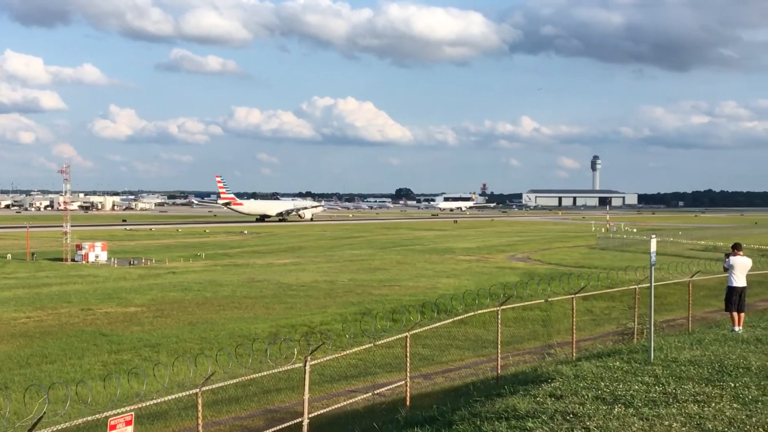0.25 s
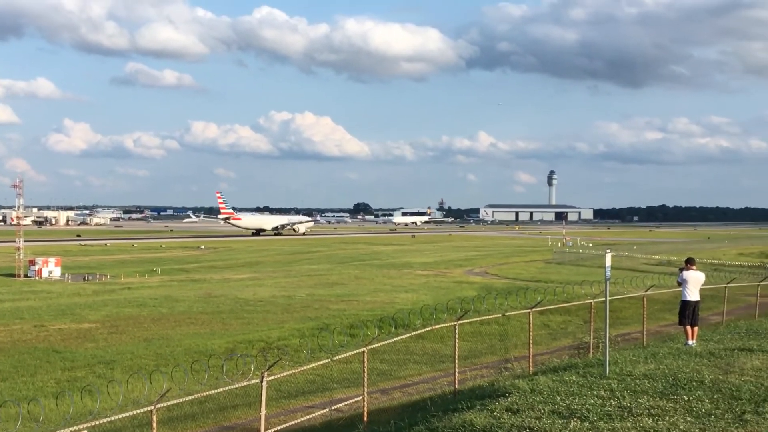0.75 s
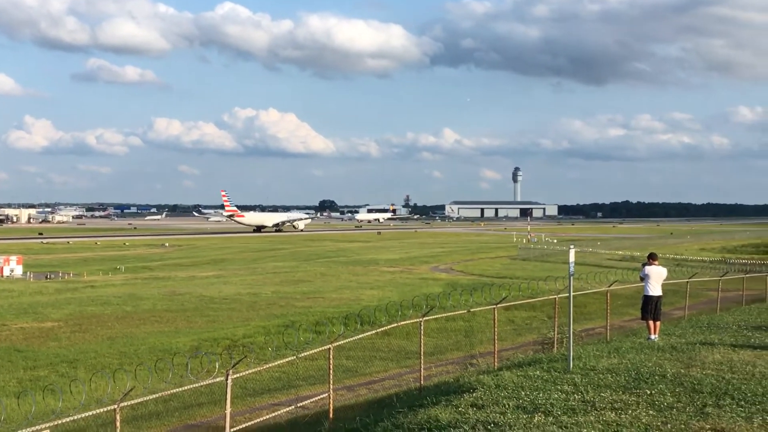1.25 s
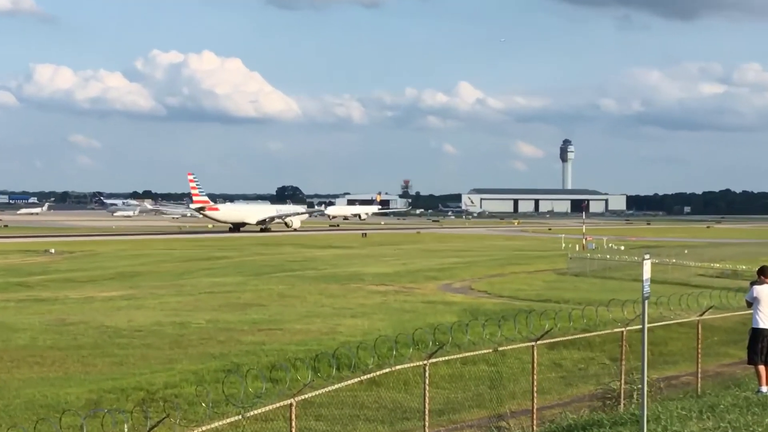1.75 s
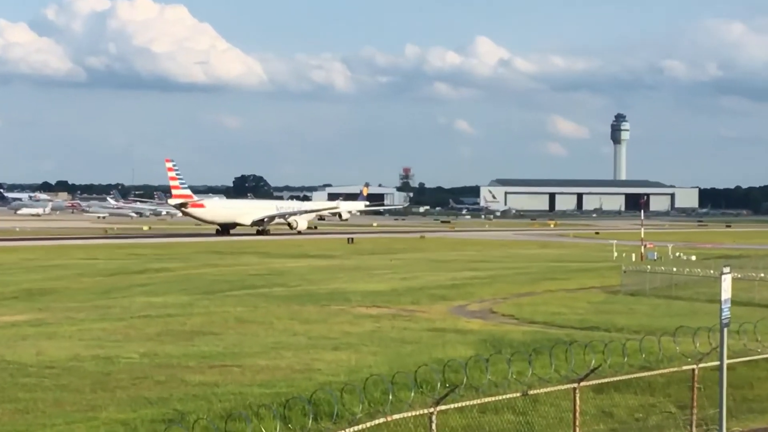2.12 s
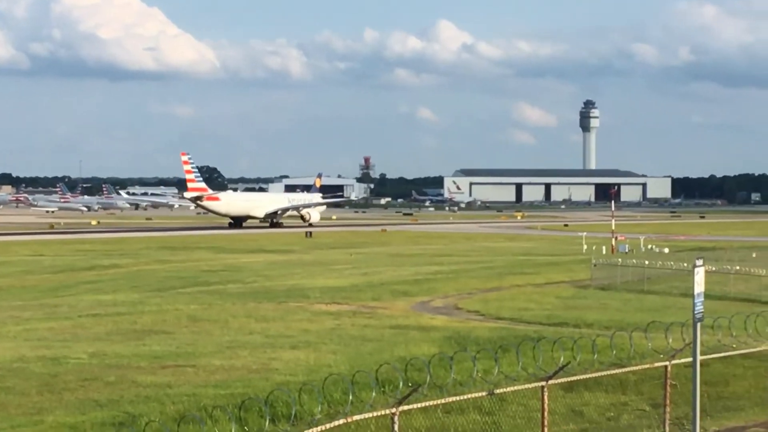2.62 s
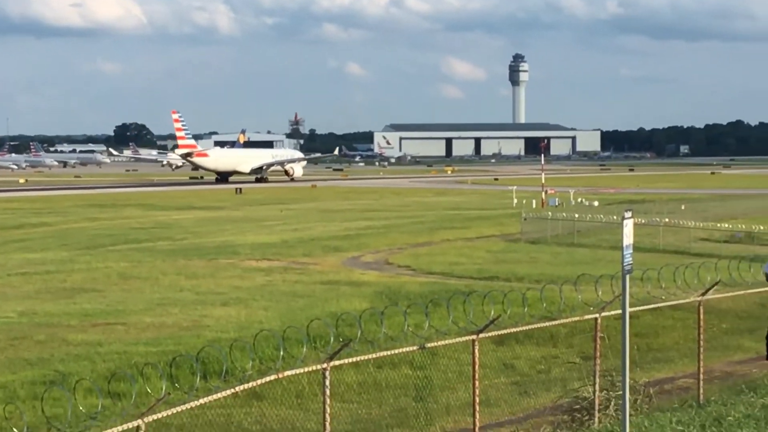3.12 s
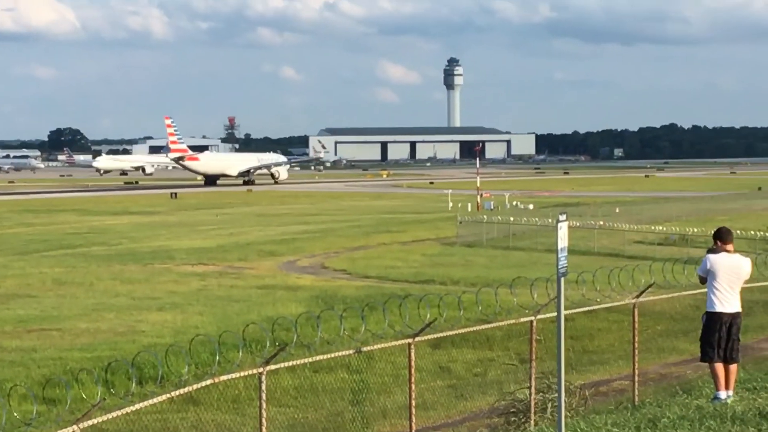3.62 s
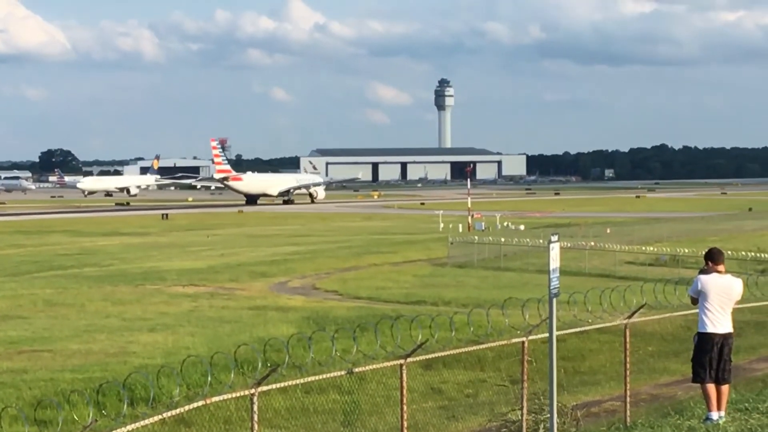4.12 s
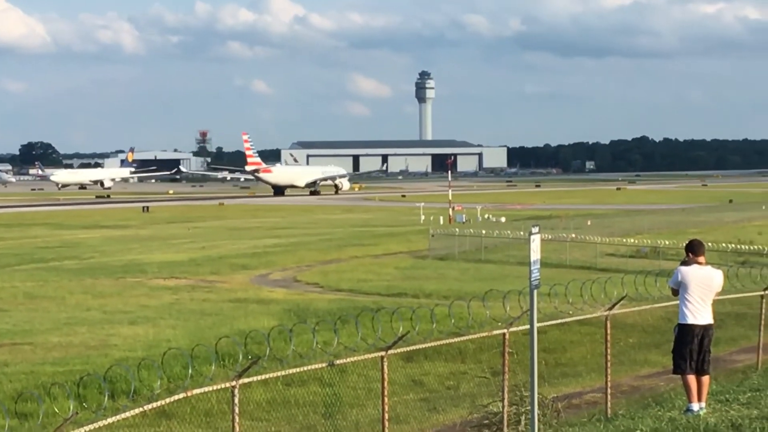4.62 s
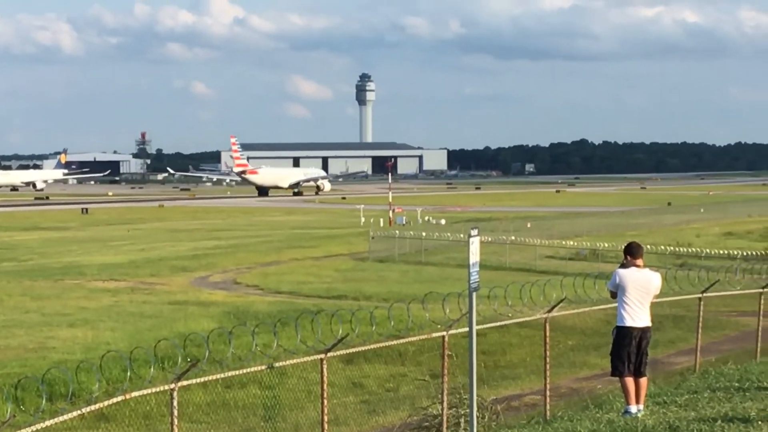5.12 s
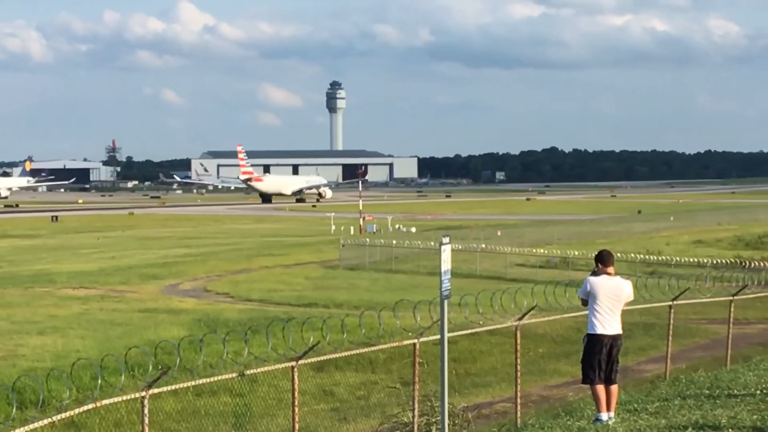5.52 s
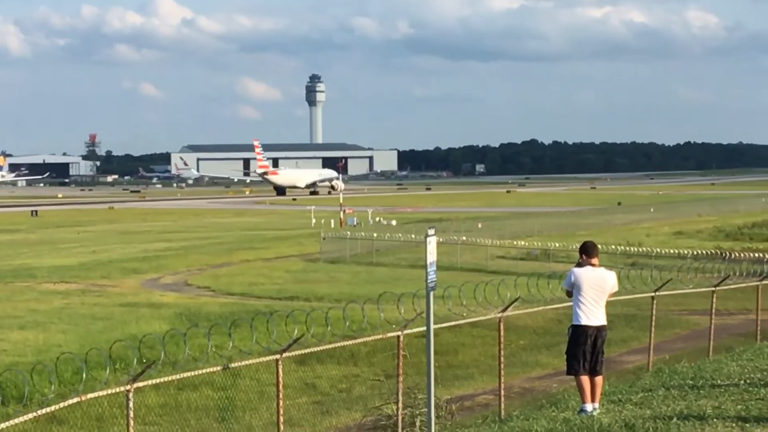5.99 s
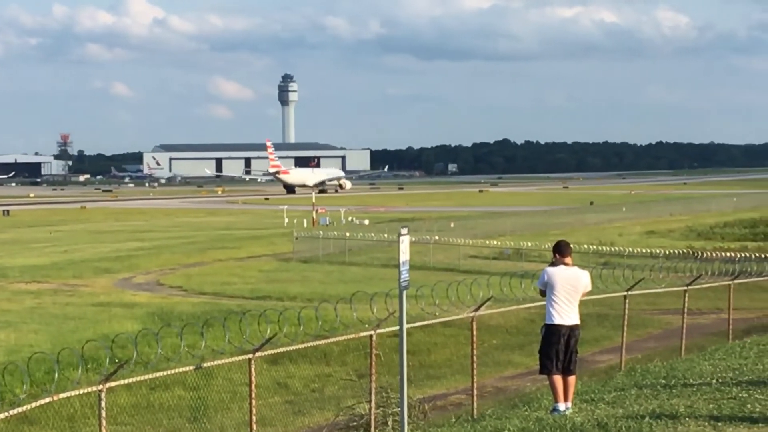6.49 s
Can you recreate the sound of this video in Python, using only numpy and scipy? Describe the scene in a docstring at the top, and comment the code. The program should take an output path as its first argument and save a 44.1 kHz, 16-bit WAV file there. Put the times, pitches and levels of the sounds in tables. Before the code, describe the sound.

Outdoors beside a wide grassy airfield, a twin-engine airliner is already at takeoff power and rolling away. Its deep rumble throbs irregularly beneath a hollow, fluttering roar with rasping treble that comes and goes. The high hiss gradually thins, and a blurred fan whine briefly stands out near the end. Wind bumps the close microphone softly, more often later. Barely audible insect ticks give way to a faint high buzz.

```python
"""Across a wide field a twin-engined airliner rolls away at takeoff power: throbbing, fluttering bands of noise.
An insect in the grass ticks in short runs of scraped noise for two seconds; lumpy low noise is wind on the
microphone, its soft thuds, short bursts, begin near 0.9 s among the ticks and come more often after 2.8 s.
From 2.2 s another insect fades in with a high buzz, noise pulsed by wing strokes that slow down. The treble comes
and goes, its hiss thins out; near 5.4 s the fan whine, a blurred tone, stands out; the strongest thud is near 5.7 s."""
import sys
import numpy as np
from scipy import signal
from scipy.fft import rfft, irfft
from scipy.io import wavfile
from scipy.ndimage import uniform_filter1d, minimum_filter1d, map_coordinates

SR = 44100
rng = np.random.default_rng(int(sys.argv[2]) if len(sys.argv) > 2 else 0)


def file_out(sig):
    """Save sig as 16-bit WAV at sys.argv[1]."""
    # one column per channel
    cols = np.atleast_2d(sig).T
    # limit, then scale
    lim = np.clip(cols, -1, 1)
    pcm = np.round(lim * 32767).astype(np.int16)
    wavfile.write(sys.argv[1], SR, pcm)


N = 297675
TIME = np.arange(N) / SR  # seconds

# the ground echo shifts the colour as the jet moves: t/s, factor on rumble f, factor on body f
COLOUR_SHIFT = [(0, 1.07, 1.055), (1.4, 1.028, 1.005), (2.3, .96, 1), (3.2, 1.024, 1.053),
                (4.4, 0.99, 0.99), (5.3, .93, 1), (6, .96, 0.95), (6.75, 0.95, 0.98)]


def from_db(db):
    """Decibels to gain."""
    return 10 ** (np.asarray(db) / 20)


def unit(x):
    """Scales to an rms of one."""
    return x / np.sqrt(np.mean(x ** 2) + 1e-20)


def curves(rows):
    """Each column of a curve table, sample by sample."""
    s, *columns = np.transpose(rows)
    return [np.interp(TIME, s, column) for column in columns]


def colour(x, spectrum):
    """Filters by a spectrum drawn on a log-frequency axis."""
    hz, db = np.transpose(spectrum)
    bins = np.fft.rfftfreq(N, 1 / SR)
    gain_db = np.interp(np.log(bins + 1), np.log(hz), db)
    return irfft(rfft(x) * from_db(gain_db), N)


def noise(spectrum):
    """Coloured noise of unit level, so only the shape of the spectrum counts."""
    return unit(colour(rng.standard_normal(N), spectrum))


def wander(rate_hz):
    """Smooth chance of unit rms, falling off steeply above the rate."""
    bins = np.fft.rfftfreq(N, 1 / SR)
    lowpass = 1 / (1 + (bins / rate_hz) ** 4)
    return unit(irfft(rfft(rng.standard_normal(N)) * lowpass, N))


def steadied(x, seconds):
    """Evens out swells slower than the given window, keeps the faster throbs, and sets unit level."""
    window = np.hanning(max(int(seconds * SR), 9))
    energy = signal.fftconvolve(x ** 2, window, "same")
    weight = signal.fftconvolve(np.ones(N), window, "same")  # allows for the cut-off ends
    power = energy / weight
    return unit(x / np.sqrt(np.abs(power) + 1e-9))


def shifted(x, factor):
    """Slides the whole spectrum of a noise up or down by a slowly changing factor."""
    position = np.cumsum(factor) % (N - 1)
    return map_coordinates(x, [position], order=3, mode="wrap")


def bursts(rows, rise, decay):
    """Envelope of events that rise quickly and die away, time constants in seconds."""
    envelope = np.zeros(N)
    for s, db in rows:
        age = np.maximum(TIME - s, 0)
        shape = (1 - np.exp(-age / rise)) * np.exp(-age / decay)
        envelope += from_db(db) * shape / (shape.max() + 1e-12)
    return envelope


def rumble(level_db=-12.5, swell_s=0.22):
    """The largest exhaust eddies throb around 70 Hz, by chance and in set surges and lulls."""
    # eddy noise before the colour shift: f/Hz, relative level/dB
    eddy_spectrum = [(8, -42), (19, -39.5), (27, -22), (36, -12), (50, -3), (73, 1), (85, -5), (106, -9),
                     (128, -19), (155, -27.5), (260, -59.5), (600, -110)]
    # the band that holds the rumble: f/Hz, gain/dB
    deep_band = [(15, -42), (24, -20.5), (34, -1), (112, 0.5), (150, -6.5), (220, -42.5), (500, -88.5)]
    shift, _ = curves(COLOUR_SHIFT)
    eddies = steadied(shifted(noise(eddy_spectrum), shift), swell_s)
    throb = from_db(level_db + swells()) * eddies
    return colour(throb, deep_band)  # even the quickest surges stay deep


def swells():
    """Level change in dB from the rumble's deepest surges and lulls, each a smooth arch."""
    # centre t/s, length/s, change of level/dB
    arches = [(0.575, .06, 5), (1.474, .1, 4), (1.683, 0.1, -7.5), (1.774, 0.067, 4), (1.881, 0.063, -6.5),
              (2.31, .12, 4), (2.484, 0.065, -6), (2.879, .06, -7), (2.953, 0.085, 5.5), (3.117, 0.067, -9),
              (3.18, .06, 4), (4.119, .1, 3), (4.223, .15, -8), (4.304, 0.079, 5.5), (4.518, 0.052, -8.5),
              (4.697, 0.071, 3), (4.782, .07, -10), (5.187, 0.11, 6), (5.27, 0.11, -7.5), (5.878, 0.06, 6),
              (5.978, 0.061, 5.5), (6.147, 0.11, -8.5), (6.318, 0.075, 6.5), (6.627, .1, -9.5)]
    change_db = 0
    for s, length, db in arches:
        change_db = change_db + db * np.cos(np.pi * np.clip((TIME - s) / length, -.5, .5))
    return change_db


def roar(body_db=0.48, rasp_db=-0.03, body_flutter_db=1.0, rasp_flutter_db=.5, hiss_flutter_db=0.96, flutter_hz=28):
    """Smaller eddies make the body, rasp and hiss; turbulent air makes them flutter."""
    # spectra, the body's before its colour shift: f/Hz, relative level/dB
    body_spectrum = [(90, -29.5), (160, -10.5), (330, -8.5), (440, -15.5), (520, -8), (600, -2), (665, 1),
                     (760, -1.5), (860, -5), (970, -9), (1100, -19), (1500, -39), (3000, -86)]
    rasp_spectrum = [(700, -32.5), (1100, -4.5), (1430, -2.5), (1800, -0.5), (2050, -4.5), (2420, -5),
                     (2640, -16), (2820, -12.5), (3010, -17.5), (3200, -11.5), (3470, -11.5), (3750, -17),
                     (4150, -18), (4700, -27), (8000, -74)]
    hiss_spectrum = [(3000, -31), (4400, -2.5), (5050, -2), (5500, 0.5), (6300, -2), (7100, -6.5),
                     (8000, -15.5), (9200, -24.5), (10500, -36), (15800, -39.5)]
    # the body as the air carries it over, before its trim: t/s, level/dB
    body_level = [(0, -25.5), (.28, -29.5), (.72, -24.5), (.95, -24.5), (1.45, -27.5), (2.3, -25.6),
                  (2.48, -30), (2.85, -27.3), (3.05, -28), (3.35, -24.5), (3.9, -28), (4.07, -32.5),
                  (4.6, -31), (4.92, -25.5), (5.4, -24), (5.85, -26.5), (6.03, -29.5), (6.27, -27.5),
                  (6.75, -28.5)]
    # the rasp, the lower treble, before its trim: t/s, level/dB
    rasp_level = [(0, -33.5), (.18, -37), (.33, -29), (.6, -35), (.77, -29.5), (1.45, -34.5), (1.62, -31),
                  (1.88, -34.5), (2.26, -31), (2.55, -35.5), (3.3, -34.5), (3.85, -36.3), (4.12, -40.5),
                  (4.35, -36), (4.63, -36.5), (4.78, -33.5), (5.25, -31), (5.38, -26.5), (5.52, -30.5),
                  (6.02, -36.5), (6.3, -31), (6.75, -35)]
    # the hiss, which the air swallows as the jet rolls away, before the rasp's swings: t/s, level/dB
    hiss_level = [(0, -45.5), (.87, -45.5), (1.9, -48.5), (2.65, -51.5), (3.1, -50), (3.5, -54),
                  (4.2, -55.5), (5.1, -53.5), (5.4, -54.5), (6.75, -56)]
    body, = curves(body_level)
    rasp, = curves(rasp_level)
    hiss, = curves(hiss_level)
    hiss = hiss + 0.5 * (rasp - rasp.mean())  # follows half of the rasp's swings
    _, shift = curves(COLOUR_SHIFT)
    hollow = steadied(shifted(noise(body_spectrum), shift), 0.18)
    out = from_db(body + body_db + body_flutter_db * wander(flutter_hz)) * hollow
    out += from_db(rasp + rasp_db + rasp_flutter_db * wander(flutter_hz)) * noise(rasp_spectrum)
    return out + from_db(hiss + hiss_flutter_db * wander(flutter_hz)) * noise(hiss_spectrum)


def fans(start_hz=1784, sag_hz_per_s=15, gain_db=-1, blur_hz=95):
    """The blade tone sinks as the jet speeds away; the air scatters it into a narrow band."""
    # the whine before the gain: t/s, level/dB
    whine_level = [(0, -55), (.4, -44), (3.2, -54), (4.4, -54.5), (4.85, -47), (5.28, -41), (5.38, -25),
                   (5.47, -44.5), (6.75, -41.5)]
    level_db, = curves(whine_level)
    phase = 2 * np.pi * np.cumsum(start_hz - sag_hz_per_s * TIME) / SR
    tone = wander(blur_hz) * np.cos(phase) + wander(blur_hz) * np.sin(phase)
    return from_db(level_db + gain_db) * steadied(tone, 0.14)


def wind(gain_db=-0.7, lumps_db=3.5, lumps_hz=25, buffet_db=-9.0, edge_db=-5.5):
    """Lumpy low turbulence at the microphone, with soft thuds, some duller than others."""
    # breeze at the microphone before the gain: t/s, level/dB
    breeze_level = [(0, -38.5), (1.5, -32.5), (2.7, -34), (2.9, -26.5), (3.05, -37.5), (3.55, -30),
                    (3.8, -44), (4.25, -32), (4.72, -40.5), (4.9, -30.5), (5.72, -29), (5.85, -34.5),
                    (6.75, -26)]
    # single buffets before their trims: t/s, peak level/dB, upper part's level relative to it/dB
    buffets = [(0.929, -18, -18), (1.235, -23, -22), (2.868, -20.5, -16), (2.939, -13, -13),
               (3.867, -21, -3), (4.147, -16, -10.5), (4.242, -13, -12), (4.382, -14, -24),
               (4.528, -21, -3), (4.688, -17.5, -11), (5.735, -8, -6.5), (5.759, -19, -7),
               (6.075, -14, -11), (6.134, -11.5, -7), (6.712, -11.5, -21)]
    # spectra of the flow, the thuds and their upper part: f/Hz, relative level/dB
    flow_spectrum = [(60, -27), (150, 0.5), (240, -0.5), (340, -3.5), (450, -14.5), (700, -17), (1500, -42),
                     (4000, -82.5)]
    thud_spectrum = [(60, -17.5), (140, -4), (185, 4), (260, -5.5), (380, -14.5), (1000, -45.5),
                     (4000, -90)]
    edge_spectrum = [(120, -25), (280, -4), (385, 5.5), (540, -4.5), (1000, -28.5), (4000, -64.5)]
    level_db, = curves(breeze_level)
    lumpy = from_db(lumps_db * wander(lumps_hz)) * noise(flow_spectrum)
    flow = from_db(level_db + gain_db) * steadied(lumpy, .12)
    thud_peaks = [(s, db + buffet_db) for s, db, _ in buffets]
    edge_peaks = [(s, db + upper + edge_db) for s, db, upper in buffets]
    thuds = bursts(thud_peaks, rise=.005, decay=0.012) * steadied(noise(thud_spectrum), 0.031)
    edges = bursts(edge_peaks, rise=0.0065, decay=0.011) * steadied(noise(edge_spectrum), 0.019)
    return flow + thuds + edges


def insects(buzz_db=3.5, stroke_depth_db=4.0, tooth_db=1.5, tooth_hz=700, tick_db=-4):
    """Wings scrape tooth by tooth: runs of ticks from one insect, a steady stream of strokes from the other."""
    # scraping wings: f/Hz, relative level/dB
    wing_spectrum = [(8000, -46), (10500, -15.5), (11400, -9.5), (12200, -11.5), (13000, -5), (14000, -3),
                     (14600, -4.5), (15150, -2), (15800, -7)]
    # the buzz before its trim: t/s, level/dB
    buzz_level = [(2.2, -82), (2.65, -70), (4.1, -68), (5.11, -64), (5.3, -68), (6.1, -68.5), (6.75, -64)]
    # short runs of ticks before their trim: start t/s, length/s, peak level/dB
    tick_runs = [(.08, .61, -60), (.745, .11, -61), (.96, .11, -61), (1.581, .11, -60), (1.821, .04, -65),
                 (2.001, .11, -63)]
    tick_gap_s = .072
    # quick strokes at first, settling towards a slower pace
    start_hz, settled_hz, settle_s = 57.8, 55.1, 1.3
    level_db, = curves(buzz_level)
    age = np.maximum(TIME - buzz_level[0][0], 0)
    rate = settled_hz + (start_hz - settled_hz) * np.exp(-age / settle_s)
    phase = 2 * np.pi * np.cumsum(rate) / SR
    strokes = unit(from_db(stroke_depth_db * np.cos(phase)))
    buzz = from_db(level_db + buzz_db) * strokes * (age > 0)
    beats = [(start + s, db) for start, length, db in tick_runs for s in np.arange(0, length, tick_gap_s)]
    ticks = from_db(tick_db) * bursts(beats, rise=.002, decay=.006)
    scrape = unit(noise(wing_spectrum) * from_db(tooth_db * wander(tooth_hz)))
    return (buzz + ticks) * scrape


def scene():
    """The jet far off across the field, wind and insects close to the microphone."""
    return (rumble() + roar() + fans() + wind() + insects())[None]


def record(dry, ceiling=1.0, edge_hz=15780):
    """A smooth peak limiter holds the loudest peaks; then soft ends and the upper band limit."""
    room = np.minimum(1, min(ceiling, 1) / (np.abs(dry) + 1e-9))
    gain = uniform_filter1d(minimum_filter1d(room, size=900), size=900)  # windows in samples
    ends = signal.windows.tukey(N, .001)
    lowpass = signal.firwin(1023, edge_hz, window=("kaiser", 9), fs=SR)
    return signal.oaconvolve(dry * gain * ends, lowpass[None], "same")


dry = scene()
out = record(dry)
file_out(out)
```